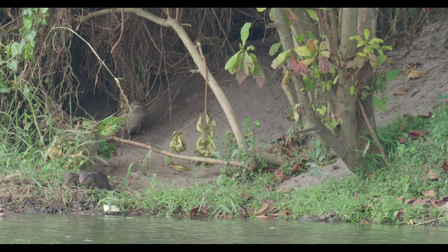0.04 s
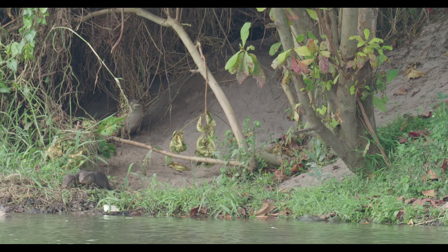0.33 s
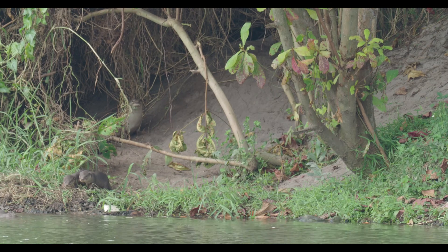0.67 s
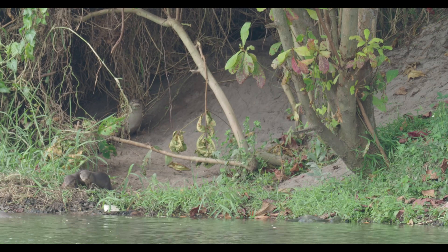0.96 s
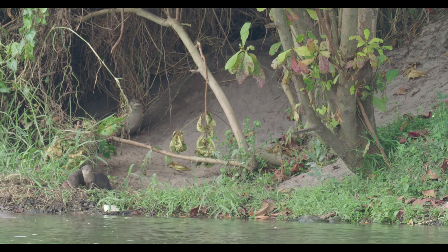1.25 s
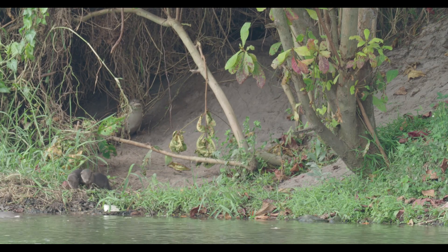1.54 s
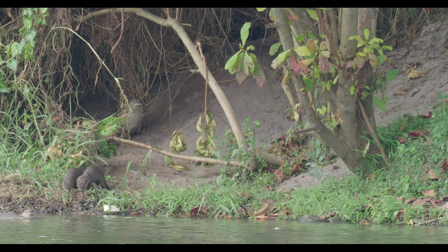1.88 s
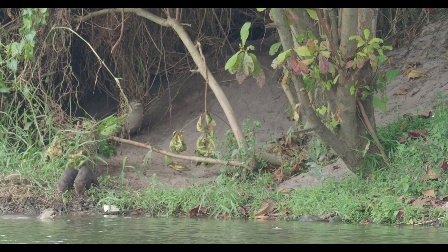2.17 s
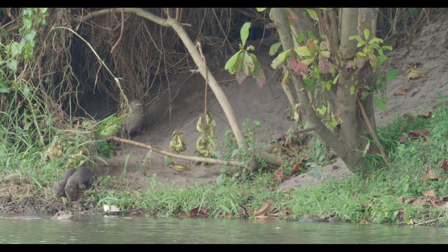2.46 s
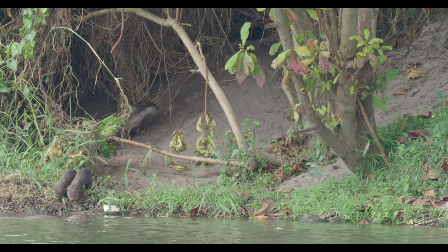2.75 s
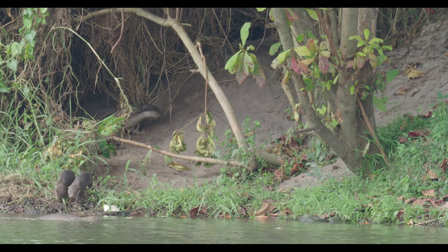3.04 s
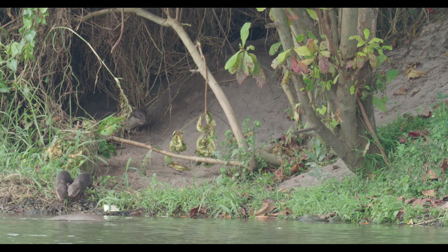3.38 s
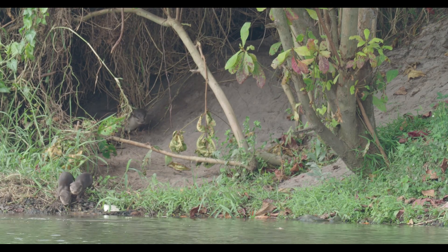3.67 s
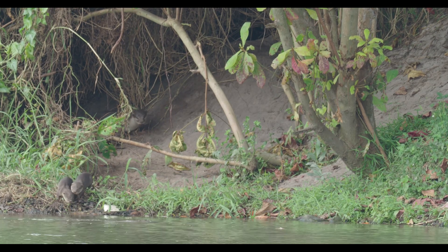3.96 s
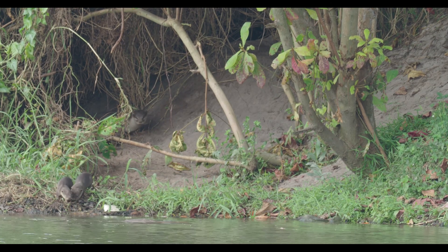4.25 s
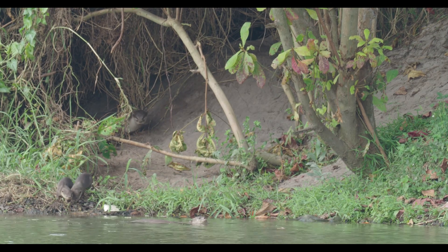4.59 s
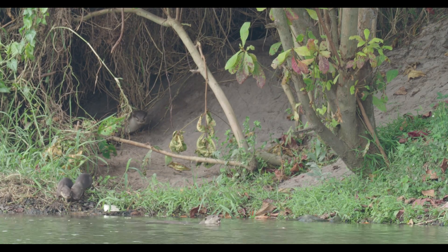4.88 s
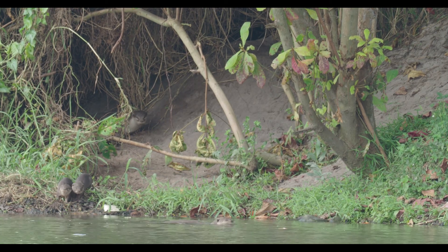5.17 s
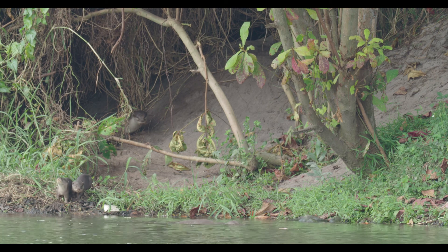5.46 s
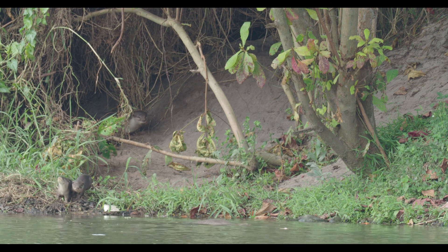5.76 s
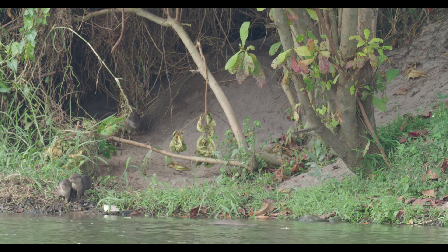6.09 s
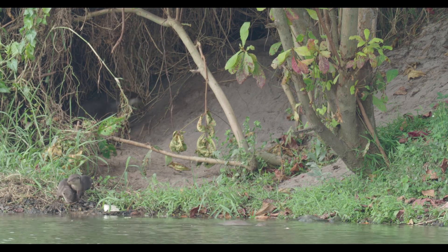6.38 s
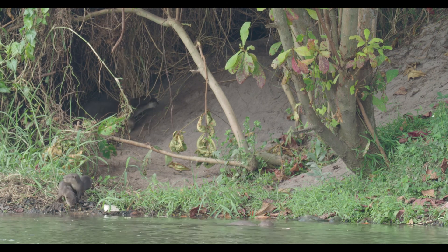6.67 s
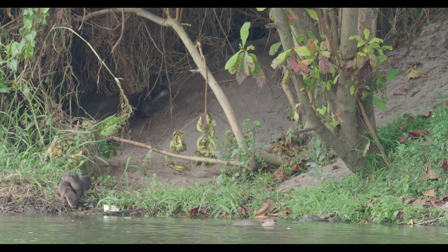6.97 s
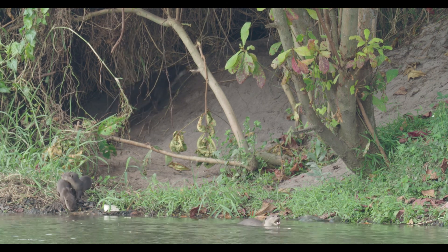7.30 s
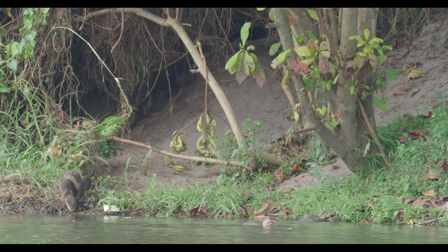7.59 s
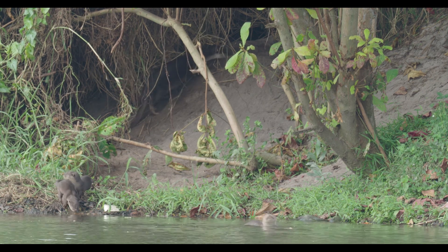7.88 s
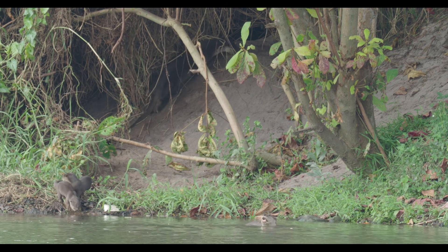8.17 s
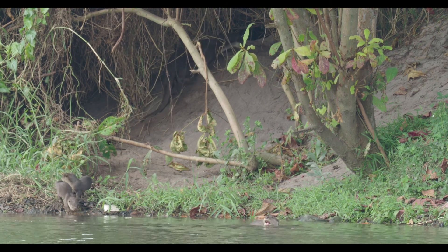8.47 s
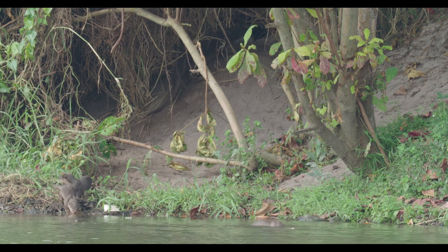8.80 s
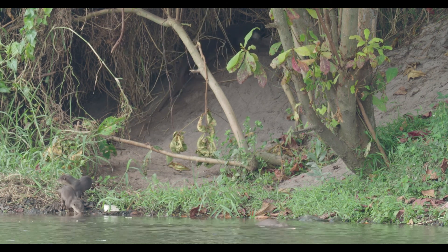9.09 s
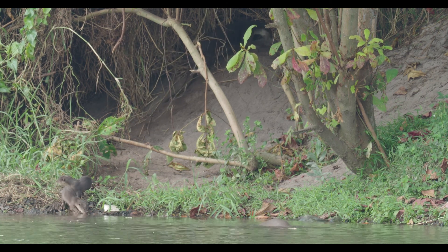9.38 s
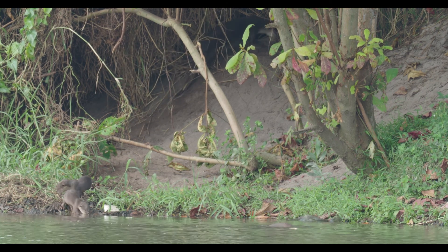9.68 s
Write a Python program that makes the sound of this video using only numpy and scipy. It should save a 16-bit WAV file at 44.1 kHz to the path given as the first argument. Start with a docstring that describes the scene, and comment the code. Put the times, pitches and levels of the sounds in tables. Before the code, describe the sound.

Low wind rumble buffets the microphone throughout, hitting left and right in turn with soft thumps, strongest on the left in the first half second. Behind it, distant traffic hums steadily, small birds chip and whistle in the riverbank trees, and an insect sings, faint and very high. From about 1.1 to 2 seconds, several otters give a faint, thin, wavering squeal to the left, while a far car swells and fades by 4 seconds. A distant knock echoes at 2.7 seconds. A short, buzzy otter chirp follows at 3 seconds, then two rising peeps near 3.8 seconds. At 5.1 seconds there is one sharp click, mostly on the left. A few more faint otter peeps come around 8.3 seconds. From 9 seconds the wind gusts harder on the right as the birds keep calling.

```python
"""Otters on the far bank of a river. From the outset, turbulent wind buffets each side of the microphone
in turn, small birds whistle in the trees, an insect sings and distant traffic hums. From 1.1 to 2 s the
otters force air through tight throats in a long, thin squeal of several voices, while a far car passes.
A distant knock echoes at 2.7 s. The otters give a buzzy chirp at 3 s and rising peeps near 3.8 s. At
5.1 s the sound jumps as at a splice, with a sharp click mostly on the left. More peeps come near 8.3 s."""
import sys
import numpy as np
from scipy import signal
from scipy.fft import rfft, irfft, next_fast_len
from scipy.io import wavfile

SR = 44100
rng = np.random.default_rng(int(sys.argv[2]) if len(sys.argv) > 2 else 0)


def transcribe(signal):
    """Save signal, clipped to [-1, 1], as a 16-bit WAV file at the path in sys.argv[1]."""
    frames = np.atleast_2d(signal).T
    limited = np.clip(frames, -1, 1)
    pcm = np.round(limited * 32767).astype(np.int16)
    wavfile.write(sys.argv[1], SR, pcm)


N = 438354
TIME = np.arange(N) / SR
LEFT, RIGHT = 0, 1  # microphone ports; every pan is the left level minus the right

# contour of the squeal, which swells twice and sinks away: t/s, f/Hz, level/dB
SQUEAL_CONTOUR = [(1.11, 5950, -76), (1.19, 6900, -68), (1.34, 7440, -69), (1.42, 7220, -70),
                  (1.5, 6730, -73.5), (1.61, 6600, -72), (1.77, 7000, -71), (1.83, 6500, -73.5),
                  (1.89, 6440, -75), (2.01, 5300, -83)]
SQUEAL_PAN_DB = 10


def squeal(grit_db, flutter_db, wobble_share, echo_db, yelp_s=.016):
    """Inharmonic tones bend on one contour; random modulation gives each a skirt of noisy sidebands."""
    # tones: frequency ratio, start level/dB, end level/dB, relative jitter, share of the yelps
    voices = [(.652, -4, -12, .008, 0), (.795, -9, -5, .005, .8), (.865, -8, 2, .0035, 1),
              (.878, -10, -17, .002, 0), (1, -5.5, -12, .002, 0), (1.13, -14, -.5, .002, 0.084),
              (1.19, -16, -8, 0.0059, 0), (1.27, -8, -11, .006, 0), (1.73, -10, -6, 0.0085, .2)]
    # yelps, quick upward flicks of pitch: t/s, relative rise
    flicks = [(1.63, .07), (1.67, .12), (1.772, .075)]
    out = np.zeros((2, N))
    t = np.arange(SQUEAL_CONTOUR[0][0], SQUEAL_CONTOUR[-1][0], 1 / SR)
    pitch, level_db = in_time(SQUEAL_CONTOUR, t)
    yelps = sum(rise * np.exp(-((t - s) / yelp_s) ** 2) for s, rise in flicks)
    for ratio, start_db, end_db, rough, yelp_share in voices:
        jitter, wobble, flutter, surge, grit = (
            drift(rate, size=2 * SR)[:len(t)] for rate in (500, 45, 70, 14, 1300))
        hz = pitch * ratio * (1 + yelp_share * yelps + rough * jitter + wobble_share * wobble)
        voice = tone(hz) * (from_db(flutter_db * (flutter + surge)) + from_db(grit_db) * grit)
        envelope = from_db(level_db + np.linspace(start_db, end_db, len(t)))
        add(out, t[0], voice * envelope * panned(SQUEAL_PAN_DB))
    return out + from_db(echo_db) * bank_echo(out, t60=.3)


def rasp(level_db, flutter_db, fade_s=.1):
    """Turbulence at a constriction: air forced through the tight throat hisses in step with the squeal."""
    # spectrum of the breath: f/Hz, relative level/dB
    breath = [(1500, -38), (2800, -19.5), (4200, -29), (5500, -33), (8500, -43), (10000, -39), (12000, -41),
              (15000, -51)]
    start, end = SQUEAL_CONTOUR[0][0], SQUEAL_CONTOUR[-1][0]
    swell = np.clip(np.minimum(TIME - start, end - TIME) / fade_s, 0, 1)
    effort = swell * from_db(in_time(SQUEAL_CONTOUR)[1] + flutter_db * drift(70))
    return noise(breath) * effort * from_db(level_db) * panned(SQUEAL_PAN_DB)


def peeps(trill_hz, slowing, throb_db):
    """Frequency modulation: a fast, slowing trill on short otter whistles, a buzz where it is deep."""
    # t/s, length/s, start f/Hz, middle f/Hz, end f/Hz, level/dB, pan/dB, trill depth/Hz, echo/dB
    calls = [(0.435, .085, 7200, 7350, 8150, -75.5, 4, 60, 6),
             (3.04, 0.073, 6750, 6450, 5830, -54.5, 7, 332, -17),
             (3.775, 0.067, 7200, 7220, 7500, -60, 6, 40, -5),
             (3.84, 0.043, 7450, 7750, 8100, -65, 7, 160, -2),
             (8.275, .04, 6750, 6750, 6850, -70, 9, 60, -6),
             (8.32, 0.043, 6800, 7040, 7540, -64, 5, 110, 3), (8.36, .06, 7400, 7300, 7200, -72, 5, 300, 0),
             (8.55, .09, 6800, 6800, 6900, -81, 5, 150, 4)]
    direct, scattered = np.zeros((2, 2, N))
    for s, length, start_hz, middle_hz, end_hz, db, pan_db, depth_hz, echo_db in calls:
        t, hz, swell = syllable(length, start_hz, middle_hz, end_hz)
        trill_phase = 2 * np.pi * np.cumsum(trill_hz * (1 - slowing * t / length)) / SR
        throb = from_db(throb_db * depth_hz / 400 * np.cos(trill_phase))  # loudest as the pitch falls
        call = rms_one(tone(hz - depth_hz * np.sin(trill_phase)) * swell * throb)
        add(direct, s, call * from_db(db) * panned(pan_db))
        add(scattered, s, call * from_db(db + echo_db) * panned(pan_db))
    return direct + bank_echo(scattered, t60=0.62)


def wind(lumpy_db, eddies_per_s, steady_db, knee_db, give, large_hz, breeze_db=-30):
    """Turbulence at each port: a stronger gust is steadier, and its smaller eddies reach higher in pitch."""
    # pressure spectrum in a plain breeze: f/Hz, density level/dB
    rumble = [(18, -46), (37, -42.5), (75, -47), (150, -55.5), (210, -63.5), (270, -73), (370, -83),
              (520, -96), (800, -104)]
    # growth of that spectrum with gust strength: f/Hz, slope/(dB per dB)
    growth = [(18, 0.69), (37, 0.69), (75, 1.03), (150, 1.12), (260, 1.5), (520, 1.7)]
    mean_db = flow_db() - breeze_db
    steadiness = np.hypot(1, np.maximum(mean_db, 0) / steady_db)
    lumps = np.array([drift(eddies_per_s), drift(eddies_per_s)]) / steadiness
    gust_db = mean_db + lumpy_db * lumps
    excess_db = np.maximum(gust_db - knee_db, 0)
    edges_hz = 14 * 2 ** np.arange(0, 6, .5)  # half octaves
    white, out = rng.standard_normal((2, 2, N)), 0
    for k, (low, high) in enumerate(zip(edges_hz, edges_hz[1:])):
        bandpass = signal.butter(3, [low, high], "band", fs=SR, output="sos")
        band = rms_one(signal.sosfilt(bandpass, white[k % 2]))
        hz = np.sqrt(low * high)
        drive_db = gust_db - give * excess_db / np.hypot(1, hz / large_hz)  # large eddies level off
        density_db = at_hz(rumble, hz) + at_hz(growth, hz) * drive_db
        out = out + band * np.sqrt(high - low) * from_db(density_db)
    return out


def flow_db(attack_s=0.049, release_s=0.033):
    """Addition of powers: the breeze plus gusts that rise, hold and decay set the level at each port."""
    # flow between gusts: t/s, left level/dB, right level/dB
    breeze = [(.23, -31.5, -33), (1.3, -37, -34), (2.2, -35.5, -30.5), (3.4, -40, -38.5), (4.4, -34, -34.5),
              (5.4, -36.5, -33.5), (6.4, -36, -35), (7.9, -39.5, -40), (9.2, -34.5, -39), (9.9, -38, -34)]
    # t/s, length/s, level/dB, port that is hit
    gusts = [(0.196, 0.072, -20, RIGHT), (0.206, .28, -18, LEFT), (0.249, .17, -12, LEFT),
             (0.61, 0.18, -24.5, LEFT), (0.846, 0.13, -26, RIGHT), (1.38, 0.38, -29, LEFT),
             (1.799, .33, -29, RIGHT), (2.295, 0.075, -25.5, LEFT), (2.293, 0.098, -26, RIGHT),
             (2.72, 0.43, -31, RIGHT), (3.4, .2, -27.5, RIGHT), (3.805, 0.13, -29.5, RIGHT),
             (4.447, .66, -34.5, LEFT), (5.495, 0.14, -28.5, RIGHT), (5.812, 0.048, -24.5, LEFT),
             (5.987, 0.54, -29.5, LEFT), (6.575, 0.095, -30.5, RIGHT), (6.71, 0.24, -30.5, LEFT),
             (7.103, 0.091, -25.5, RIGHT), (7.293, 0.24, -32, RIGHT), (8.31, .16, -32.5, LEFT),
             (8.574, .18, -28.5, RIGHT), (8.71, 0.25, -33, LEFT), (9.048, .19, -22.5, RIGHT),
             (9.311, 0.053, -19.5, RIGHT), (9.697, 0.056, -21.5, RIGHT)]
    power = from_db(in_time(breeze)) ** 2
    for s, length, db, port in gusts:
        rise = np.clip((TIME - s) / attack_s, 0, 1)
        decay = np.exp(-np.clip((TIME - s - length) / release_s, 0, 20))
        power[port] += (from_db(db) * rise * decay) ** 2
    return 10 * np.log10(power)


def buffets(spread, decay_s, level_db):
    """Heavily damped oscillation: an eddy that hits a port gives one short swing of pressure."""
    # t/s, relative level/dB, pan/dB, nominal f/Hz
    eddies = [(.315, -9.5, 23, 190), (.368, -13, 20, 180), (.419, -10, 18, 192), (0.685, -25, 18, 248),
              (0.713, -18, 26, 272), (1.931, -17, -13, 192), (2.11, -23, -16, 222), (3.111, -20, -19, 241),
              (5.098, -15.5, 18, 174), (6.19, -13.5, 26, 190), (7.161, -25, -16, 216),
              (7.339, -23, -17.5, 260), (9.064, -19, -18, 210), (9.189, -17, -27, 284),
              (9.355, -16, -20, 180), (9.383, -20.5, -23, 314), (9.735, -24, -19, 264)]
    out, t = np.zeros((2, N)), np.arange(SR // 10) / SR
    envelope = (t / decay_s) * np.exp(1 - t / decay_s)
    for (s, db, pan_db, thump_hz), detune in zip(eddies, rng.normal(0, spread, len(eddies))):
        swing = np.sin(2 * np.pi * thump_hz * np.exp(detune) * t) * envelope
        add(out, s, swing * from_db(db + level_db) * panned(pan_db))
    return out


def splice_click(corner_hz):
    """Discontinuity: the signal jumps as at a splice and relaxes at once, a sharp click mostly left."""
    # t/s, peak level/dB, pan/dB
    jumps = [(5.098, -18.5, 13)]
    out, t = np.zeros((2, N)), np.arange(SR // 50) / SR
    for s, db, pan_db in jumps:
        add(out, s, np.exp(-2 * np.pi * corner_hz * t) * from_db(db) * panned(pan_db))
    return out


def birds(calls, quiver_db, direct_db, echo_db, t60):
    """Random modulation makes whistles quiver in level and hoarse in pitch; the trees scatter them."""
    out = np.zeros((2, N))
    for s, length, start_hz, middle_hz, end_hz, db, pan_db, rough in calls:
        t, hz, swell = syllable(length, start_hz, middle_hz, end_hz)
        swell = rms_one(swell * from_db(quiver_db * drift(92, size=SR)[:len(t)]))
        jitter = rough * drift(450, size=SR)[:len(t)]
        call = tone(hz * (1 + jitter)) * swell * from_db(db)
        lag = rng.integers(3, 6)  # the bird's direction delays the right port, in samples
        add(out, s, np.array([call, np.roll(call, lag)]) * panned(pan_db))
    return from_db(direct_db) * out + from_db(echo_db) * bank_echo(out, t60)


def near_calls(chip_s=0.0607, chip_hz=3060, chip_pan_db=7):
    """Pitch contour and roughness distinguish five kinds of bird call from the nearer trees."""
    # one bird's repeated, arched chip: t/s, level/dB
    chips = [(.34, -66), (.735, -55), (1.11, -59.5), (1.48, -64), (5.11, -63), (5.46, -61), (6.17, -61.5),
             (7.61, -63), (8.77, -58), (9.13, -61), (9.5, -62), (9.87, -58.5)]
    # the other four kinds: t/s, length/s, f/Hz, level/dB, pan/dB
    level_whistles = [(1.39, 0.062, 3020, -55.5, -2), (1.92, 0.14, 2986, -58.5, 0),
                      (4.87, 0.092, 3110, -58.5, 3), (5.6, .14, 3110, -63, 0),
                      (6.45, 0.162, 3110, -56.5, -1), (7.2, 0.12, 3154, -55, -3)]
    falling_slurs = [(2.19, .12, 2700, -58, -4), (3.61, .11, 3080, -62.5, 3), (4.04, .11, 2780, -62, 9),
                     (5.5, .09, 3680, -59.5, 3), (5.78, 0.073, 3260, -56.5, 3), (5.85, .055, 2810, -59, 5),
                     (6.81, .064, 2590, -55.5, 4), (6.81, .1, 3230, -57.5, -1), (8.34, .2, 3580, -57, 3)]
    thin_lisps = [(2.03, .09, 5800, -75, -11), (2.23, .1, 5800, -73, -9), (2.82, .08, 5800, -74, -11),
                  (5.41, .06, 5600, -72, -6), (6.92, .04, 5620, -72.5, -10)]
    hoarse_notes = [(.855, .06, 3820, -62, 2), (2.34, .06, 3760, -68, 5), (3.54, .06, 3690, -62, 7),
                    (3.78, 0.2, 3820, -66, 2), (4.86, .14, 3980, -66, 1), (7.51, 0.065, 3950, -64, 3),
                    (8.04, .1, 3620, -59, 8), (8.16, 0.19, 4030, -64, 2), (9.28, 0.042, 4030, -65.5, 4),
                    (9.74, .07, 3680, -63, 7)]
    chip_rows = [(s, chip_s, chip_hz, db, chip_pan_db) for s, db in chips]
    calls = contours(chip_rows, arch=.14, fall=-.015, rough=.01)
    calls += contours(level_whistles, arch=0.0254, fall=-0.0038, rough=0.023)
    calls += contours(falling_slurs, arch=-0.011, fall=0.11, rough=0.0404)
    calls += contours(thin_lisps, arch=.01, fall=.004, rough=.04)
    return calls + contours(hoarse_notes, arch=.025, fall=-0.0054, rough=0.041)


def contours(rows, arch, fall, rough):
    """Similar glides: arch lowers both ends of a call and fall tilts it, as fractions of its pitch."""
    return [(s, length, hz * (1 - arch + fall), hz, hz * (1 - arch - fall), db, pan_db, rough)
            for s, length, hz, db, pan_db in rows]


def far_calls(level_db, count):
    """A random point process: faint calls of farther birds, independent in time and pitch."""
    when, duration, pitch, tilt, faintness = rng.random((count, 5)).T
    length = 0.041 + 0.063 * duration
    hz, bend_hz = 2700 + 1200 * pitch, 500 * (tilt - .5)
    db = level_db - 6 * faintness - 5 * pitch
    pan_db, rough = np.zeros(count), np.full(count, .01)
    return np.transpose([when * N / SR, length, hz - bend_hz, hz + 80, hz + bend_hz, db, pan_db, rough])


def knock(at_s, crack_db, crack_t60, attack_s=.003):
    """Two-stage decay: a distant blow cracks, then its resonances die away in the echo along the river."""
    # f/Hz, bandwidth/Hz, level/dB, T60/s
    resonances = [(820, 160, -48, .9), (1005, 80, -46, 1.6), (1290, 160, -50, .9), (2300, 700, -66, .6)]
    age, out = np.maximum(TIME - at_s, 0), 0
    for hz, width_hz, db, t60 in resonances:
        fade = from_db(-60 * age / t60) + from_db(crack_db - 60 * age / crack_t60)
        out = out + fade * from_db(db) * narrow_noise(hz, width_hz, channels=1)
    return out * np.minimum(age / attack_s, 1)


def car(hz, width_hz):
    """Band-limited noise: the tyre hiss of one far car swells and fades."""
    # t/s, level/dB
    passage = [(.3, -84), (1.2, -55), (2.2, -60.5), (3.1, -57.5), (4.2, -70), (9.9, -67)]
    return narrow_noise(hz, width_hz, channels=1) * from_db(in_time(passage)[0])


def traffic(roar_db, spread_db, tyre_db, pan_db):
    """Road roar from ahead reaches both ports mostly in phase; tyres sing in one narrow band."""
    # slow swell of the traffic: t/s, level/dB
    swell = [(.3, -50), (1.6, -48.5), (3.6, -50), (5.4, -49), (7.3, -48.5), (8.6, -49.5), (9.9, -49.5)]
    # spectrum of the roar: f/Hz, relative level/dB
    road = [(100, -2), (200, 13.5), (300, -0.5), (420, 2), (530, -2.5), (660, 1), (850, -.5), (1000, 0.5),
            (1280, -4), (1550, -18), (2000, -23.5), (3000, -29), (5000, -36.5)]
    ahead, around = rms_one(noise(road + [(SR / 2, -90)]))
    roar = ahead + from_db(spread_db) * around * [[1], [-1]]
    tyres = from_db(tyre_db) * narrow_noise(hz=998.6, width_hz=36, channels=1)
    return (from_db(roar_db) * roar + tyres) * from_db(in_time(swell)[0]) * panned(pan_db)


def trees(chorus_db, pan_db, bank_db):
    """Incoherent sources merge into a steady hiss, with narrow bands for a far chorus and an insect."""
    # leaves, water and far birds: f/Hz, density level/dB
    hiss_spectrum = [(500, -100.5), (1400, -90), (2000, -97), (2600, -91), (3100, -94.5), (3700, -99),
                     (4400, -107), (5500, -108), (7200, -107), (8500, -111), (10000, -109), (11200, -114),
                     (13000, -113), (15500, -114)]
    # the insect's high song: t/s, level/dB
    insect_level = [(0, -76), (3, -79.5), (5.5, -79.5), (7, -77), (8.2, -75.5), (8.9, -74.5), (9.9, -73.5)]
    bank = noise(hiss_spectrum, channels=1)[0]
    from_left = np.array([bank, np.roll(bank, 4)])  # reaches the right port later
    share = from_db(bank_db)
    hiss = (noise(hiss_spectrum) + share * from_left) / np.hypot(1, share)
    chorus = narrow_noise(hz=3098, width_hz=110) * from_db(chorus_db + 3.5 * drift(6.4))
    insect = narrow_noise(hz=9800, width_hz=750) * from_db(in_time(insect_level)[0])
    return (hiss + chorus + insect) * panned(pan_db)


def bank_echo(x, t60):
    """Diffuse scattering: trunks, leaves and the bank give a call a short, exponential tail."""
    t = np.arange(SR) / SR
    tail = rng.standard_normal((2, SR)) * from_db(-60 * t / t60) * (1 - np.exp(-t / .008))
    tail /= np.sqrt(np.sum(tail ** 2, axis=1, keepdims=True))
    return signal.fftconvolve(x, tail, axes=1)[:, :N]


def syllable(length, start_hz, middle_hz, end_hz):
    """Time, parabolic pitch glide and swelling envelope of one short call."""
    t = np.arange(int(length * SR)) / SR
    progress = t / length
    swell = np.sqrt(np.sin(np.pi * progress)) * np.minimum(8 * progress, 1)
    parabola = np.polyfit([0, .5, 1], [start_hz, middle_hz, end_hz], 2)
    return t, np.polyval(parabola, progress), rms_one(swell)


def tone(hz):
    """Phase is the integral of frequency: a gliding sine of unit rms."""
    return np.sqrt(2) * np.sin(2 * np.pi * np.cumsum(hz) / SR)


def noise(spectrum, channels=2):
    """Spectral shaping: independent noises whose density follows rows of f/Hz, level/dB."""
    size = next_fast_len(N)
    hz = np.maximum(np.fft.rfftfreq(size, 1 / SR), 1)
    white = rfft(rng.standard_normal((channels, size)))
    return irfft(white * from_db(at_hz(spectrum, hz)), size)[:, :N] * np.sqrt(SR / 2)


def narrow_noise(hz, width_hz, channels=2):
    """Resonance: white noise passed twice through one resonator, at unit rms."""
    radius = np.exp(-np.pi * width_hz / SR)
    poles = [1, -2 * radius * np.cos(2 * np.pi * hz / SR), radius * radius]
    once = signal.lfilter([1, 0, -1], poles, rng.standard_normal((channels, N)))
    return rms_one(signal.lfilter([1, 0, -1], poles, once))


def drift(rate, size=N):
    """Random fluctuation of unit rms, interpolated between `rate` values a second."""
    position = np.arange(size) * rate / SR
    count = int(position[-1]) + 2
    return rms_one(np.interp(position, np.arange(count), rng.standard_normal(count)))


def from_db(db):
    """Amplitude ratio of a level in decibels."""
    return 10 ** (np.asarray(db) / 20)


def rms_one(x):
    """Normalisation to unit rms."""
    return x / np.sqrt(np.mean(x ** 2) + 1e-20)


def in_time(rows, t=TIME):
    """Linear interpolation of each column of a curve at times t."""
    s, *columns = np.transpose(rows)
    return [np.interp(t, s, column) for column in columns]


def at_hz(points, hz):
    """Interpolation of a spectrum on a log-frequency axis."""
    f, value = np.transpose(points)
    return np.interp(np.log(hz), np.log(f), value)


def panned(pan_db):
    """Constant-power panning: left and right gains of mean power one."""
    return rms_one(from_db(np.array([[pan_db], [-pan_db]]) / 2))


def add(out, s, sound):
    """Superpose a sound from time s onward."""
    start = int(s * SR)
    out[:, start:start + sound.shape[-1]] += sound[..., :N - start]


def scene():
    """Superposition of otters, birds, the far background, wind on the microphone and one click."""
    otters = squeal(grit_db=-7, flutter_db=1.8, wobble_share=.005, echo_db=-6)
    otters += rasp(level_db=-2.2, flutter_db=1.5)
    otters += peeps(trill_hz=230, slowing=.45, throb_db=9)
    song = birds(near_calls(), quiver_db=2.5, direct_db=-1.5, echo_db=-6, t60=.4)
    song += birds(far_calls(level_db=-64.5, count=70), quiver_db=3, direct_db=-4, echo_db=-3, t60=.45)
    far = traffic(roar_db=6.0, spread_db=-14.5, tyre_db=-10, pan_db=1.7) + car(hz=1284, width_hz=305)
    far += trees(chorus_db=-72.5, pan_db=0.3, bank_db=-6.0)
    far += knock(at_s=2.675, crack_db=-3, crack_t60=0.1)
    air = wind(lumpy_db=2.5, eddies_per_s=25, steady_db=8, knee_db=8.0, give=0.58, large_hz=108)
    air += buffets(spread=0.12, decay_s=0.0028, level_db=-3.0)
    return otters + song + far + air + splice_click(corner_hz=700)


def record(dry):
    """Gating and band limiting: the sound begins abruptly and a steep low-pass cuts the top."""
    start_s, cutoff_hz = 0.225, 15750
    lowpass = signal.ellip(10, .1, 90, cutoff_hz, fs=SR, output="sos")
    return signal.sosfilt(lowpass, dry * (TIME >= start_s))


dry = scene()
out = record(dry)
transcribe(out)
```